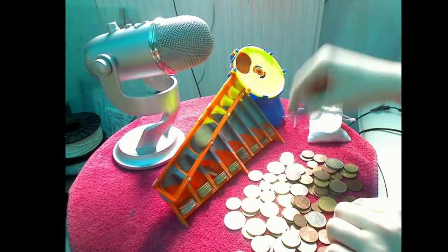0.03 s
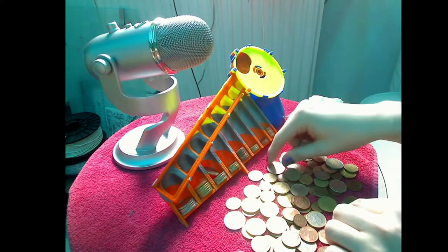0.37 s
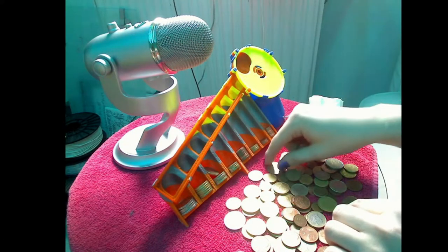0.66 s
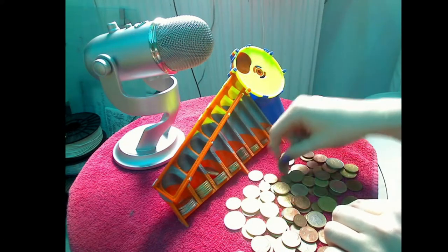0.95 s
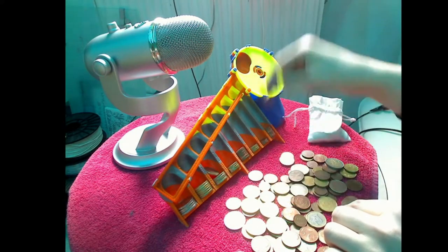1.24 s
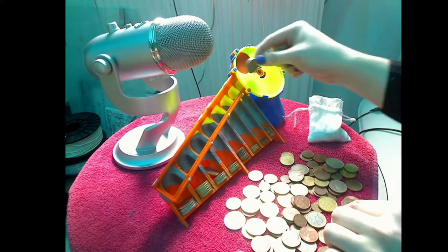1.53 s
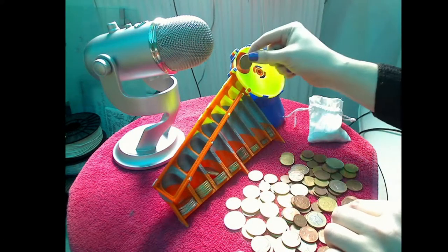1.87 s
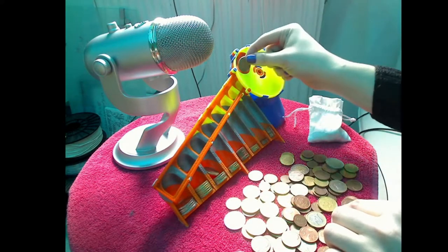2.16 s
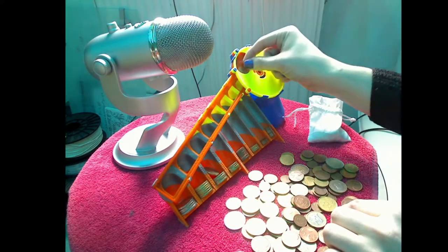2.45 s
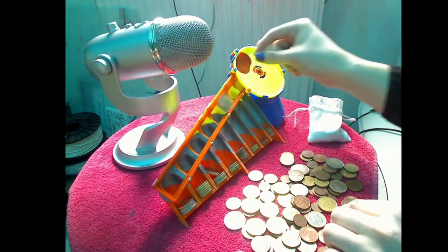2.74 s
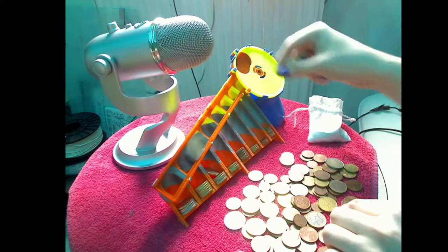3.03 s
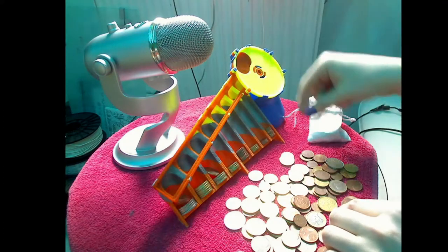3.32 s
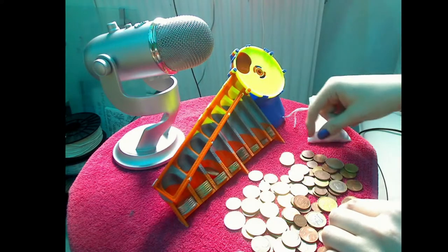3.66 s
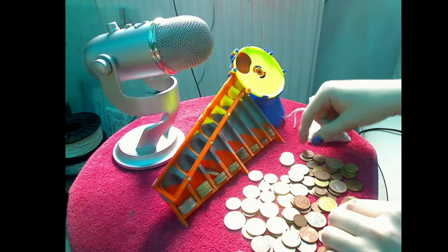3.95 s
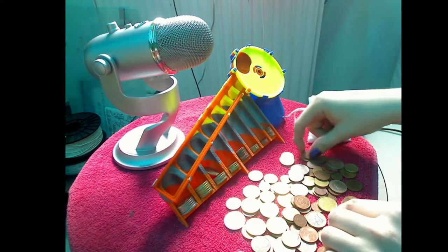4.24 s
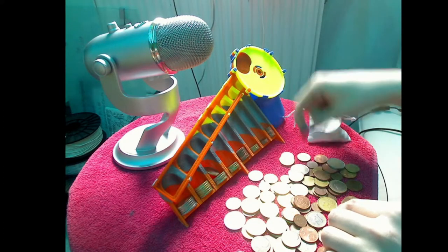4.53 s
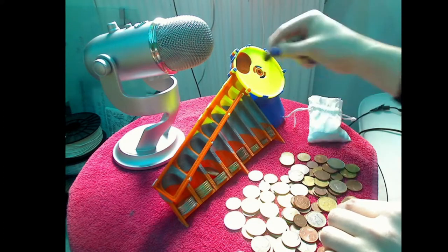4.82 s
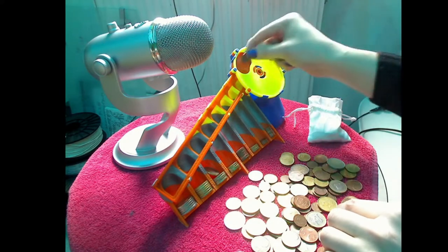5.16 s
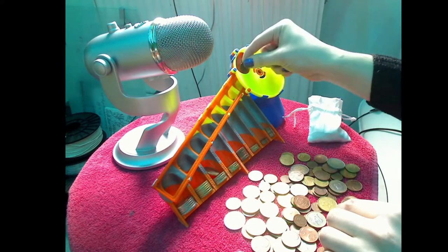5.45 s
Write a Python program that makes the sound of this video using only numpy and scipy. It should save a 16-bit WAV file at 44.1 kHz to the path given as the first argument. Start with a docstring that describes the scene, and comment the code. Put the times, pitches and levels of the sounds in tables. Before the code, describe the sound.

Two coins in turn clatter through a plastic coin sorter and land with sharp clinks, with faint coin handling in between, heard close.

```python
"""A plastic coin sorter on a table in a small, dry room, close to a stereo desk microphone.
A coin is already rolling down the ramp; it rattles through its slot and clinks on the stack at 0.4 s.
Fingers take another from a heap on a towel and scrape it over the hopper. At 2.4 s it drops on the ramp,
rolls, and lands a second later. Then the fingers go softly back to the heap. All along, the table
carries knocks and the tremble of hands into the microphone stand as a low rumble."""
import sys
import numpy as np
from scipy import signal
from scipy.fft import rfft, irfft
from scipy.io import wavfile
from scipy.ndimage import uniform_filter1d

SR = 44100
rng = np.random.default_rng(int(sys.argv[2]) if len(sys.argv) > 2 else 0)


def dump(signal):
    """Clip the signal to [-1, 1] and save it as 16-bit WAV at the path in sys.argv[1]."""
    limited = np.clip(np.atleast_2d(signal).T, -1, 1)
    pcm = np.round(limited * 32767).astype(np.int16)
    wavfile.write(sys.argv[1], SR, pcm)


N = 246519
T = np.arange(N) / SR
HZ = np.arange(N // 2 + 1) * SR / N

# Coin on plastic. Each row: start in seconds, relative level in dB, treble tilt in dB per octave.
KNOCKS = [(.0564, -51.5, 1), (.215, -54.5, -3), (0.2841, -31.5, -0.5), (0.333, -45, -5), (.3484, -23, -1),
          (0.396, -27, 0), (1.6009, -56.5, -1), (2.006, -71.5, -8.5), (2.058, -68.5, -13),
          (2.3494, -50, -5), (2.3911, -14.5, 1), (2.509, -50, -9), (2.519, -38, -2), (2.624, -47, -4),
          (2.7067, -75, -2.5), (2.7876, -43, -4), (3.0001, -52.5, -1), (3.1037, -41, 0), (3.2072, -36, 1),
          (3.2553, -22.5, -1), (3.295, -40.5, -4), (3.3329, -16.5, 1.5), (3.344, -22.5, -2),
          (5.203, -63, -7.5), (5.39, -77, -9)]
# The sorter's walls, heard close. Each row: frequency in Hz, relative level in dB.
PLASTIC_COLOUR = [(150, -25.5), (400, -13), (700, -19), (1100, -31), (1500, -16), (1900, -4), (3000, 0.5),
                  (5000, 6), (7500, 4), (10000, 5.5), (13000, 3.5), (16000, -4)]
def wall_knocks(t60=0.035, gain_db=5, bounce_s=0.0145, bounce_db=-11):
    """Coins strike the thin plastic walls, which ring only briefly, and bounce once."""
    out = np.zeros((2, N))
    for start, db, tilt_db in KNOCKS:
        wall = response(PLASTIC_COLOUR, tilt_db)
        add(out, start, undb(db + gain_db) * convolve(crack(t60), wall))
        add(out, start + bounce_s, undb(db + gain_db + bounce_db) * convolve(crack(t60), wall))
    return out


# Coin on coin. Each row: start in seconds, relative click level in dB, mode, relative ring level in dB.
CLINKS = [(0.3729, -17.5, "G", -9.5), (0.381, -20, "G", -26), (0.3915, -22, "I", -11),
          (0.394, -23, "H", -10), (0.446, -26.5, "F", -23), (0.4673, -23.5, "G", -38),
          (0.5096, -26, "E", -29), (0.5311, -35, "F", -41), (0.725, -60.5, "J", -82),
          (.886, -50.5, "K", -71), (0.9734, -46, "J", -46), (.984, -53, "K", -53),
          (3.4018, -24, "A", -53.5), (3.413, -23, "A", -31), (3.474, -34, "A", -43),
          (3.4831, -24.5, "H", -50), (3.51, -35, "A", -44), (3.5333, -46, "C", -40.5),
          (4.152, -46, "A", -60), (4.348, -63, "C", -44), (4.372, -48, "K", -54), (4.43, -48.5, "J", -42.5),
          (4.439, -52, "C", -52)]
# The click of metal. Each row: frequency in Hz, relative level in dB.
METAL_COLOUR = [(200, -24), (650, -28.5), (1200, -40), (2000, -14.5), (3500, -9), (5200, 4.5), (8000, 4.5),
                (11000, 5.5), (14000, 5.5), (16000, 2.5)]
def coin_clicks(t60=0.013, gain_db=5, chink_width_hz=1300, thin_below_db=-27.5):
    """Metal meets metal in a hard click; coins lying against it chink, damped, at the pitch of its ring."""
    out, t = np.zeros((2, N)), T[:481]
    for start, db, mode, ring_db in CLINKS:
        # a light touch stirs only the coin, not what it lies on, so it sounds thinner
        metal = response(METAL_COLOUR, tilt_db=0.28 * max(thin_below_db - db, 0))
        hz, _ = COIN_MODES[mode]
        chink = np.sin(2 * np.pi * hz * t) * t * np.exp(-np.pi * chink_width_hz * t)
        add(out, start, undb(db + gain_db) * convolve(crack(t60), metal))
        add(out, start, undb(ring_db) * convolve(crack(t60), chink / np.linalg.norm(chink)))
    return out


# The coins' bending modes, by letter. Each entry: frequency in Hz, time to fall 60 dB in seconds.
COIN_MODES = dict(A=(10450, .11), C=(11700, .018), E=(13070, .07), F=(13146, .08), G=(13240, .1),
              H=(13695, .06), I=(13870, .05), J=(14100, .07), K=(15510, .11))
def coin_rings(rise_s=0.00081, split_hz=165, twin_db=-17, gain_db=3, right_phase_rad=1.8):
    """After each click the coin's bending mode rings, split in two by its relief."""
    out, t = np.zeros((2, N)), T[:12000]
    first_phase = dict(zip(COIN_MODES, rng.random(len(COIN_MODES))))
    for start, _, mode, db in CLINKS:
        hz, t60 = COIN_MODES[mode]
        cycles = hz * (t + T[int(start * SR)]) + first_phase[mode]  # a new blow feeds the same swing
        phase = 2 * np.pi * cycles + np.array([[0], [right_phase_rad]])
        ring = np.sin(phase) + undb(twin_db) * np.sin(phase - 2 * np.pi * split_hz * t)
        add(out, start, undb(db + gain_db) * ring * onset(t, rise_s) * fade(t, t60))
    return out


# A coin's way down. Each row: the seconds at which it meets the ramp, tips into its slot, hits the stack
# and lies still, then relative levels in dB of its roll, its knock in the tube and its thud.
COIN_RUNS = [(-.3, 0.283, .384, 0.49, -60, -43.5, -27.5), (2.396, 3.253, 3.336, 3.466, -55.5, -51, -20)]
def coin_motion(roll_db=0, rattle_db=0, attack_s=0.019, t60=0.27):
    """Strength of the coins' motion: a steady roll down the ramp, then a stronger wobble in the tube."""
    power = 0
    for ramp, slot, _, still, db, *_ in COIN_RUNS:
        power += (undb(db + roll_db) * swell(ramp, slot, attack_s, t60)) ** 2
        power += (undb(-50.5 + rattle_db) * swell(slot, still, attack_s, t60)) ** 2
    return np.sqrt(power)


# Fingers slide a coin over heap or hopper. Each row: start and length in seconds, relative level in dB.
SLIDES = [(0.854, .11, -86), (1.767, 0.06, -72.5), (2.03, 0.03, -79.5), (2.29, 0.12, -72.5),
          (5.213, 0.049, -81)]
# A scraping coin. Each row: frequency in Hz, relative level in dB.
SCRAPE_COLOUR = [(200, -19.5), (400, -16), (700, -31), (1100, -42.5), (1450, -23.5), (1750, -4), (2400, -3),
                 (3000, 3.5), (4400, 2), (6200, 1.5), (9400, -2), (12500, -7), (15800, -10.5)]
def coin_scrapes(ticks_per_s=1200, scatter_db=2.5, wobbles_per_s=19, wobble_db=3, gain_db=-6):
    """The milled rim and the relief of a rolling or sliding coin catch in dense, uneven ticks."""
    catches = rng.random(N) < ticks_per_s / SR
    ticks = catches * undb(scatter_db * np.minimum(rng.exponential(size=N), 4))
    grain = 0
    for tilt_db in (-3, 3):  # duller or brighter as the coin leans unevenly on the rail
        scrape = convolve(spread(ticks * rng.standard_normal((2, N))), response(SCRAPE_COLOUR, tilt_db))
        grain += unit(scrape) * undb(wobble_db * wander(wobbles_per_s))
    slides = sum(undb(db) * swell(start, start + length, attack_s=0.012, t60=0.51)
                 for start, length, db in SLIDES)
    return grain * (coin_motion() + slides) * undb(gain_db)


# The coin tube. Each row: frequency in Hz, relative level in dB.
TUBE_COLOUR = [(250, -8), (500, -1.5), (1300, -6.5), (2200, -25)]
def tube_landings(t60=0.14):
    """As a coin lands, the tube and the stack in it give a dull, hollow knock."""
    out, tube = np.zeros((2, N)), response(TUBE_COLOUR)
    for _, _, stack, _, _, db, _ in COIN_RUNS:
        add(out, stack, undb(db) * convolve(crack(t60), tube) / np.sqrt(2))
    return out


# The chute's narrow resonances. Each row: frequency in Hz, relative level in dB.
CHUTE_MODES = [(2950, -76.5), (3537, -87.5), (3698, -86), (4011, -91), (4280, -79), (5012, -80),
               (6810, -83), (7063, -82)]
def chute(x, width_hz=44, strongest_db=-1.5):
    """The walls of the chute ring on at a few pitches under every knock and scrape."""
    top_db = max(db for _, db in CHUTE_MODES)
    ringing = sum(undb(db - top_db) * resonance(hz, width_hz) for hz, db in CHUTE_MODES)
    return irfft(rfft(x) * (1 + undb(strongest_db) * ringing), N)


LOW_DB_PER_DB = 0.73  # a harder knock is shorter, so its low sounds grow more slowly than its crack
# The hopper's bowl. Each row: frequency in Hz, relative level in dB, time to fall 60 dB in seconds.
BOWL_MODES = [(193, -3.5, 0.12), (310.5, -12.5, 0.5), (324, -10, 0.25)]
def hopper_notes(gain_db=-33.5, detune=0.004):
    """The hollow bowl answers each knock on the sorter with a short low note."""
    out, t = np.zeros((2, N)), T[:20000]
    for start, db, _ in KNOCKS:
        note = sum(undb(mode_db) * np.sin(2 * np.pi * hz * rng.normal(1, detune) * t) * fade(t, t60)
                   for hz, mode_db, t60 in BOWL_MODES)
        add(out, start, undb(gain_db + LOW_DB_PER_DB * db) * note[None])
    return out


# Fingers press a coin on towel or hopper. Each row: start in seconds, relative thud level in dB,
# contact time in milliseconds, relative pat level in dB.
PRESSES = [(0.973, -55.5, 0.76, -77), (1.602, -51, 1.96, -84.5), (4.152, -44, 15, -77),
           (4.353, -57.5, .85, -75), (4.489, -41, 2.65, -102), (5.203, -52, 2, -89)]
# A fingertip's pat. Each row: frequency in Hz, relative level in dB.
PAT_COLOUR = [(150, -2), (350, -4), (700, -5), (1200, -23), (3000, -47)]
def finger_pats(t60=0.12):
    """A coin pressed down under a fingertip gives a muffled pat."""
    out, pat = np.zeros((2, N)), response(PAT_COLOUR)
    for start, _, _, db in PRESSES:
        add(out, start, undb(db) * convolve(crack(t60), pat))
    return out


def table_thuds(gain_db=3, knock_db=-18.5, knock_ms=1, fall_ms=1.3, size=36000):
    """Each knock, fall or finger press pushes the table briefly; a softer contact gives a duller thud."""
    out = np.zeros((2, N))
    ring = microphone_stand(signal.unit_impulse(N))[:, :size] * np.linspace(1, 0, size) ** 0.5
    pushes = [(start, knock_db + LOW_DB_PER_DB * db, knock_ms) for start, db, _ in KNOCKS]
    for ramp, slot, stack, *_, db in COIN_RUNS:
        falls = [(ramp, db - 6.5), (slot, db - 3.5), (stack, db)]
        pushes += [(start, fall_db, fall_ms) for start, fall_db in falls if start > 0]
    pushes += [press[:3] for press in PRESSES]
    for start, db, contact_ms in pushes:
        softness = fade(1000 / SR, 2 * contact_ms)
        thud = signal.lfilter([1], [1, -softness], ring)
        add(out, start, undb(db + gain_db) * thud / np.abs(thud).max())
    return out


# A hand rests on heap or hopper. Each row: start and length in seconds, level in dB.
RESTING_HANDS = [(.55, 0.46, -61.5), (1.593, 0.87, -60.5), (4.129, 0.48, -59), (5.201, 0.31, -59.5)]
def table_rumble(stereo_spread=0.96):
    """Hands and moving coins keep the table trembling under the microphone."""
    tremble = microphone_stand(rng.standard_normal(N) + stereo_spread * rng.standard_normal((2, N)))
    running_rms = np.sqrt(uniform_filter1d(np.mean(tremble ** 2, axis=0), size=3500))
    hands = sum(undb(db) * swell(start, start + length, attack_s=0.026, t60=0.27)
                for start, length, db in RESTING_HANDS)
    coins = coin_motion(roll_db=14.5, rattle_db=16.5)
    return tremble / running_rms * np.hypot(hands, coins)


# Resonances of table, sorter and stand. Each row: frequency and half-width in Hz, relative level in dB,
# left minus right in dB.
STAND_MODES = [(27.64, 2.5, 7, 1), (45.3, 1.8, 4, 8.5), (75, 5.8, 7.5, 4), (86.94, 5.3, 4.5, 1.5),
               (135.45, 8, 0, 12), (194, 10, -33, 5.5), (288.9, 12, -39, 1.5), (600, 170, -54.5, 0)]
def microphone_stand(push):
    """The table and the stand pass only their low resonances up to the microphone."""
    gain = sum(undb(db) * pan(pan_db) * resonance(hz, 2 * half_width_hz) ** 2
               for hz, half_width_hz, db, pan_db in STAND_MODES)
    return irfft(rfft(push) * gain, N)


# The stereo image at the desk microphone. Each row: frequency in Hz, side minus mid in dB.
STEREO_WIDTH = [(100, -1), (600, 2.5), (2000, 7.5), (5000, 5), (9000, 6.5), (14000, 1.5)]
def spread(x):
    """Mid and side to left and right; sound from beside the capsules reaches them partly in antiphase."""
    size = x.shape[1]
    width = gain_at(STEREO_WIDTH, np.arange(size // 2 + 1) * SR / size)
    mid, side = rfft(x) / np.sqrt(1 + width ** 2)
    return irfft(np.array([mid + width * side, mid - width * side]), size)


def room_echoes(x, t60=0.12, build_s=0.005, shared=0.73, size=13000):
    """Nearby surfaces answer within milliseconds and die away fast; the capsules share part of the echo."""
    t = T[:size]
    echoes = rng.standard_normal((2, size)) + shared * rng.standard_normal(size)
    tail = echoes * onset(t, build_s) * fade(t, t60)
    return convolve(x, unit(tail) / np.sqrt(size))


# The still room at the microphone. Each row: frequency in Hz, relative level in dB.
ROOM_TONE_COLOUR = [(20, -72), (45, -78.5), (80, -93.5), (200, -112), (900, -135), (8000, -123),
                    (16000, -122)]
def room_tone(rms_db=-62):
    """Deep rumble of the building and the microphone's own hiss."""
    spectrum = rfft(rng.standard_normal((2, N))) * gain_at(ROOM_TONE_COLOUR, HZ)
    return undb(rms_db) * unit(irfft(spectrum, N))


def crack(t60, rise_s=0.00013, size=4096):
    """One contact: a burst from the many short-lived modes of the struck parts."""
    burst = spread(rng.standard_normal((2, size))) * onset(T[:size], rise_s) * fade(T[:size], t60)
    return burst * np.sqrt(SR * t60 / np.log(1e6) / np.sum(burst ** 2))


def response(colour, tilt_db=0, size=1024):
    """Causal impulse response of unit energy with a given colour, tilted per octave above 1500 Hz."""
    hz = np.arange(size // 2 + 1) * SR / size
    gain = gain_at(colour, hz) * undb(tilt_db * np.log2(np.maximum(hz, 1500)))
    cepstrum = irfft(np.log(gain))
    cepstrum[1:size // 2] *= 2  # fold to minimum phase
    cepstrum[size // 2 + 1:] = 0
    impulse = irfft(np.exp(rfft(cepstrum)))
    return impulse / np.linalg.norm(impulse)


def resonance(hz, width_hz):
    """Complex spectrum of one damped mode, 1 at its peak."""
    return 1 / (1 + 1j * (HZ ** 2 - hz ** 2) / (width_hz * HZ + 1e-9))


def gain_at(colour, hz):
    """Gain of a (Hz, dB) spectrum at given frequencies."""
    points_hz, db = np.transpose(colour)
    return undb(np.interp(np.log(hz + 1), np.log(points_hz), db))


def convolve(x, impulse):
    """Filter each channel."""
    return signal.fftconvolve(np.atleast_2d(x), np.atleast_2d(impulse), axes=1)[:, :x.shape[-1]]


def add(out, start, sound):
    """Mix a sound in at a start time in seconds."""
    i = max(int(start * SR), 0)
    out[:, i:i + sound.shape[1]] += sound[:, :N - i]


def swell(start, end, attack_s, t60):
    """Attack, hold and release."""
    return onset(np.maximum(T - start, 0), attack_s) * fade(np.maximum(T - end, 0), t60)


def onset(t, rise_s):
    """Smooth rise from 0 to 1."""
    return 1 - np.exp(-(t / rise_s) ** 2)


def fade(t, t60):
    """Decay by 60 dB every t60."""
    return undb(-60 * t / t60)


def wander(steps_per_s):
    """Slow random curve with a spread near 1."""
    steps = rng.standard_normal(256)
    return np.interp(T * steps_per_s, np.arange(len(steps)), steps)


def pan(db):
    """Left and right gains, db apart."""
    return undb(np.array([[db], [-db]]) / 2)


def unit(x):
    """Scale to rms 1."""
    return x / np.sqrt(np.mean(x ** 2))


def undb(db):
    """Decibels to gain."""
    return 10 ** (np.asarray(db) / 20)


def scene(plastic_db=-0.5, clatter_echo_db=-2, ring_echo_db=-11, pan_db=0.3):
    """The sorter close up and almost centred, heard through the air and through the table."""
    plastic = undb(plastic_db) * chute(wall_knocks() + coin_scrapes())
    clatter = plastic + tube_landings() + coin_clicks() + finger_pats()
    rings = coin_rings()
    echoes = room_echoes(undb(clatter_echo_db) * clatter + undb(ring_echo_db) * rings)
    air = (clatter + rings + echoes) * pan(pan_db)
    return air + hopper_notes() + table_rumble() + table_thuds() + room_tone()


def record(dry):
    """The recorder cuts the treble steeply above 15.9 kHz."""
    return signal.sosfilt(signal.ellip(8, 0.2, 70, 15900, fs=SR, output="sos"), dry)


dry = scene()
out = record(dry)
dump(out)
```